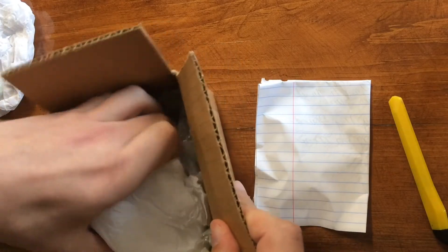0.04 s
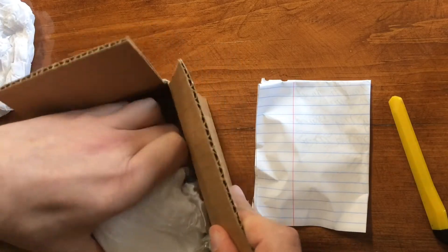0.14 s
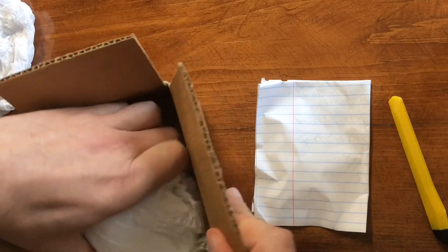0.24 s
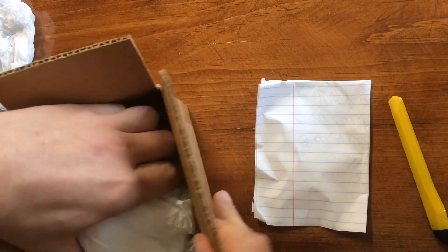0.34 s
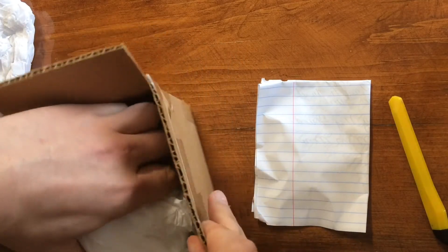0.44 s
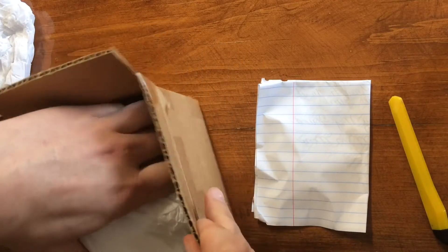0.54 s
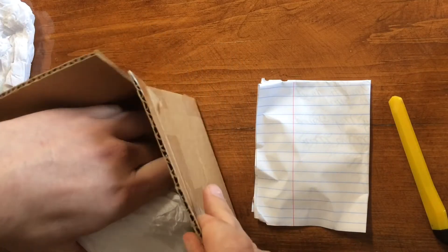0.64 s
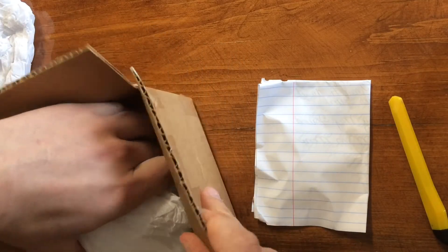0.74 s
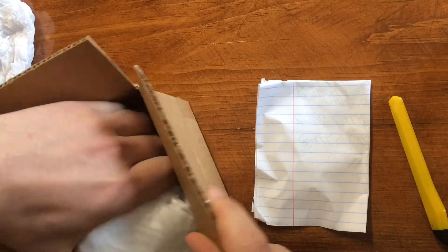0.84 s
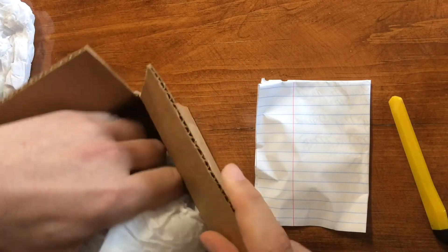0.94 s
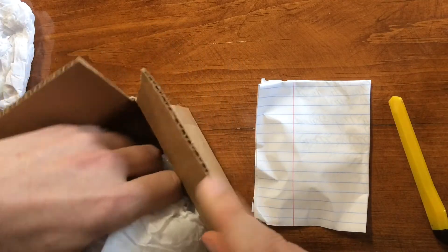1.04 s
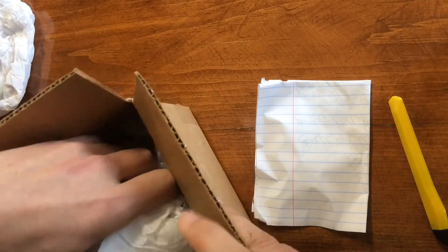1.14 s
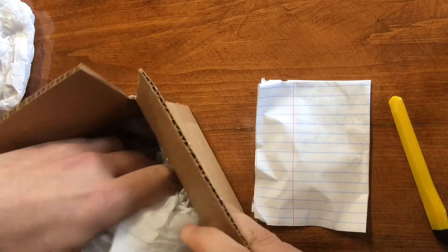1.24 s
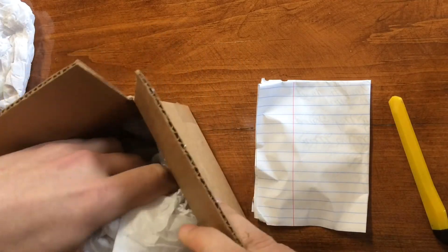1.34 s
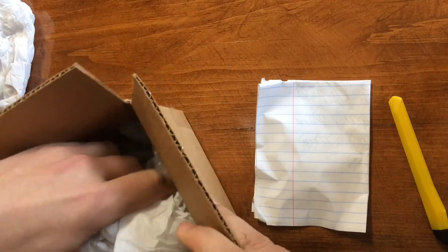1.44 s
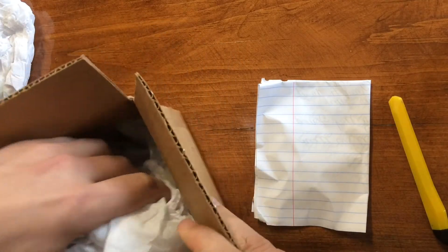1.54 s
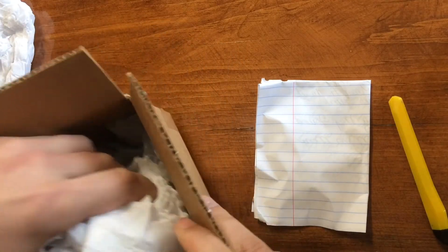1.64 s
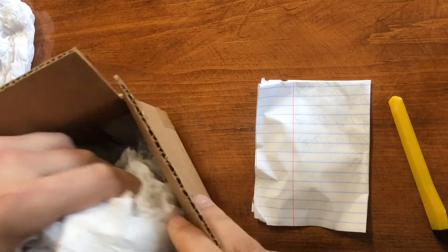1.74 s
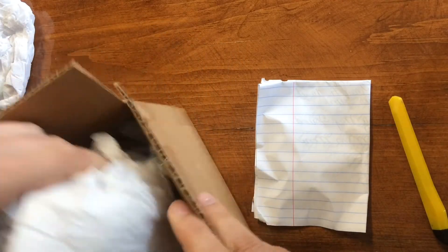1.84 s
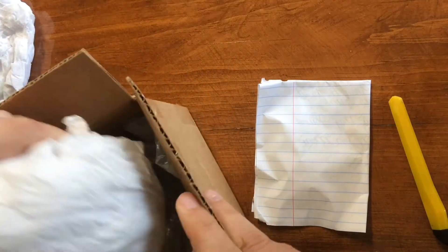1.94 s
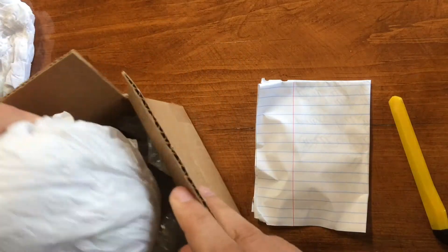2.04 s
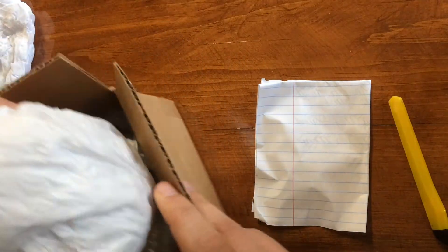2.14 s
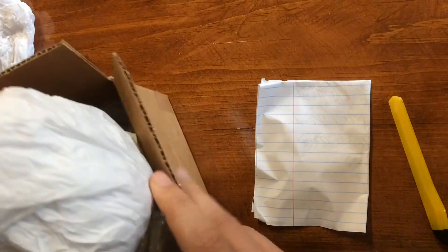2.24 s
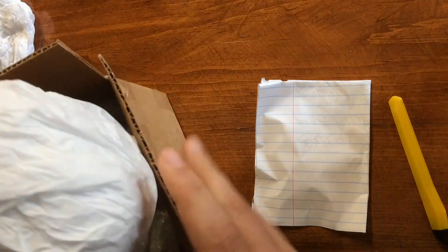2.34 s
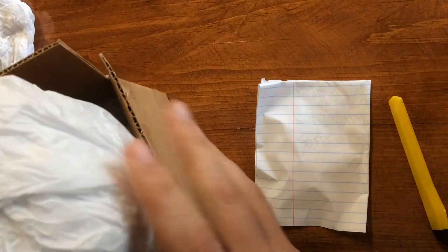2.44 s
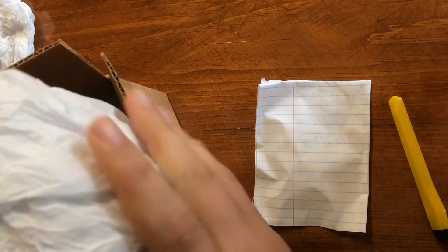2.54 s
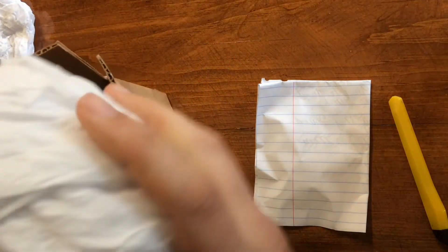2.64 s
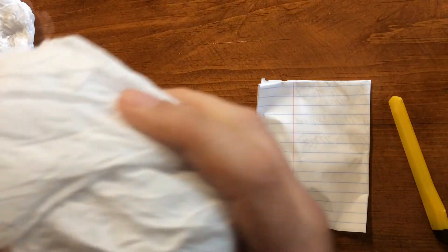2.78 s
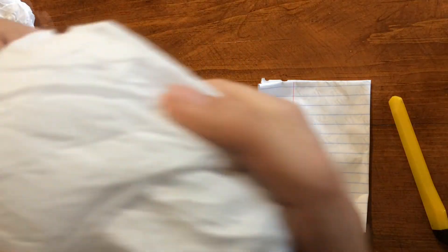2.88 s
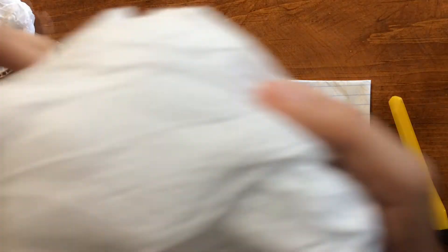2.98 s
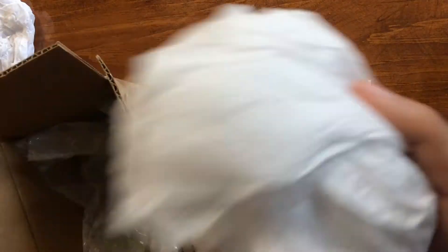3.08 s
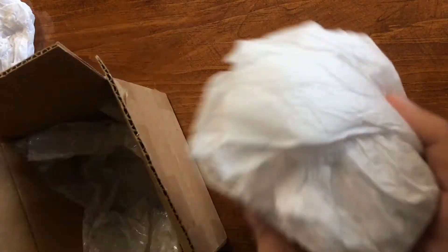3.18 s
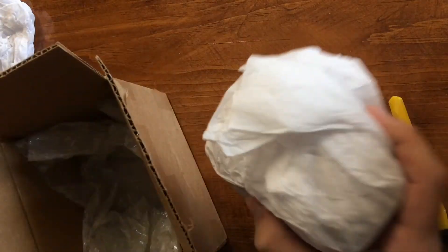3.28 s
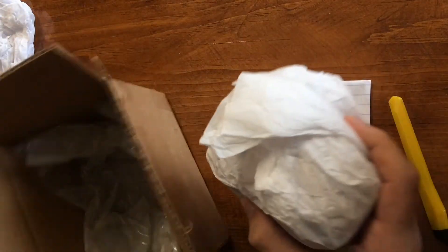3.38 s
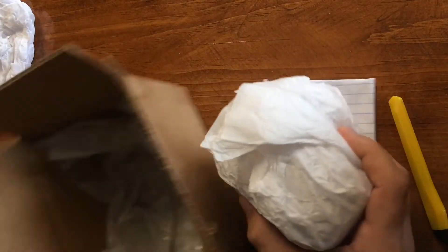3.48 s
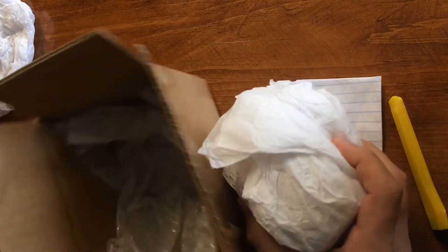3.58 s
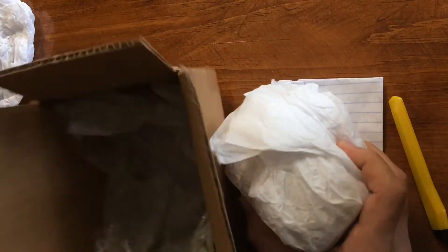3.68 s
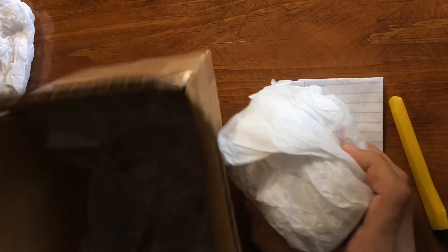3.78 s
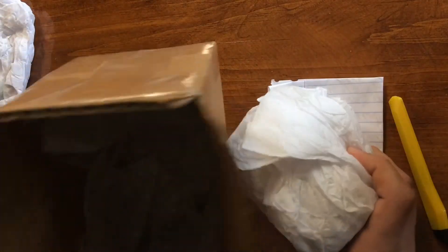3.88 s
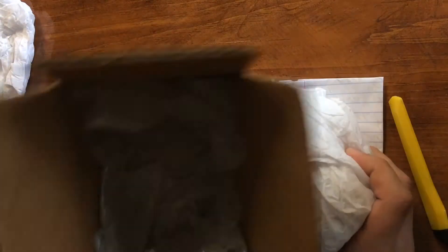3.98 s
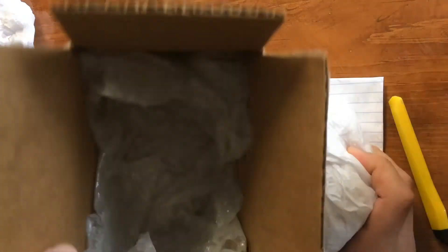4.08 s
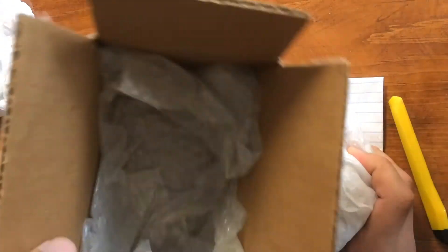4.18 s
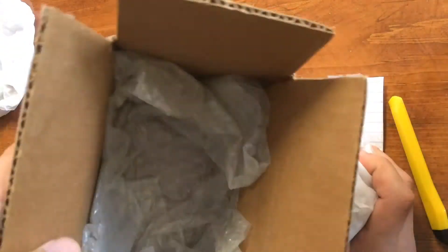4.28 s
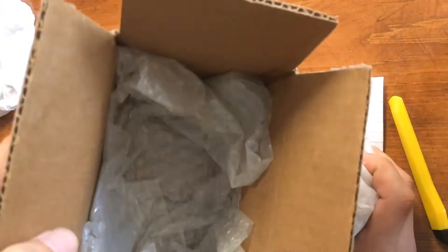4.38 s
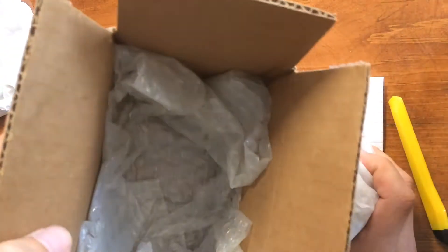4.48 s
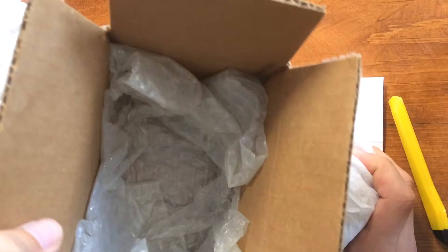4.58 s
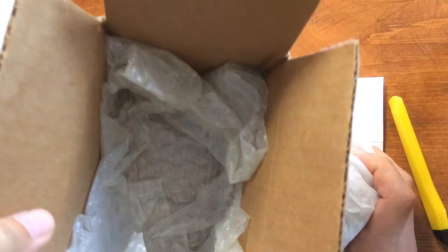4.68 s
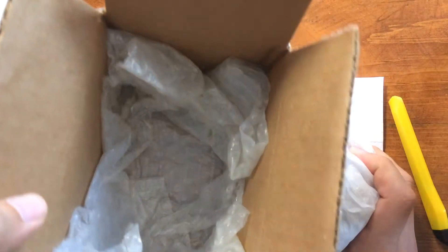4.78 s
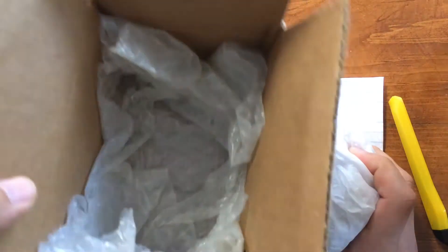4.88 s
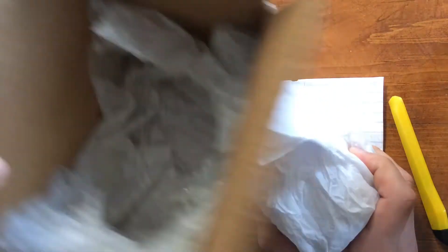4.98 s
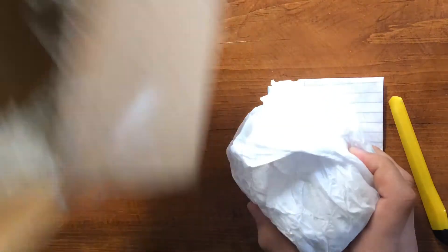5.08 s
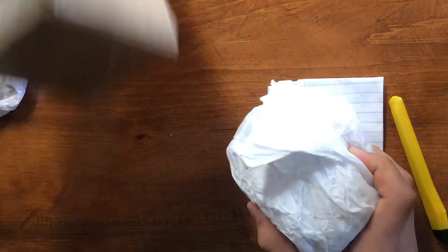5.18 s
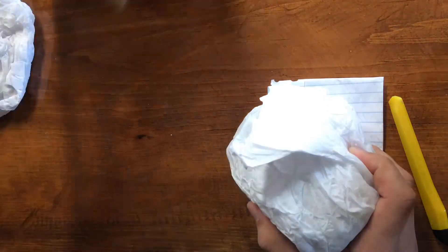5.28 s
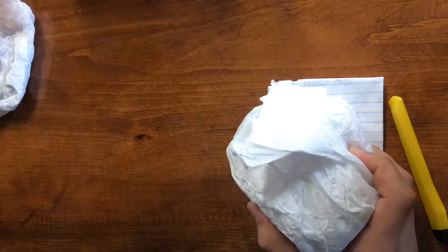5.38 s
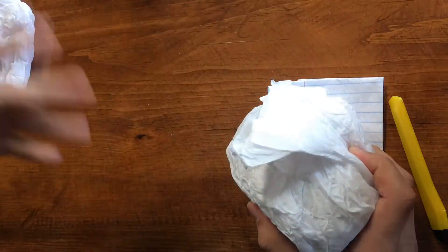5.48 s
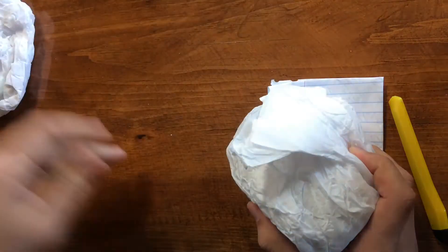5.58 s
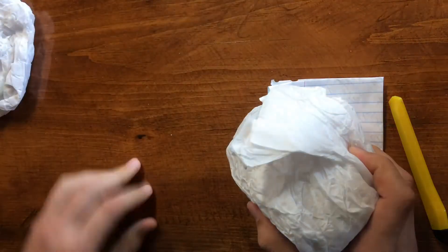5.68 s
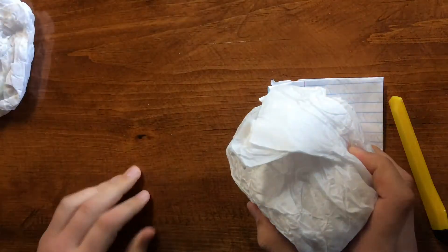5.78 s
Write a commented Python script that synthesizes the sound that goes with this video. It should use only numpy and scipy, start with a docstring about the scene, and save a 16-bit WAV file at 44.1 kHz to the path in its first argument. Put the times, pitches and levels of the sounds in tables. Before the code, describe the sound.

Close up in a small quiet room, hands rub wrapping paper against cardboard in quick uneven strokes with fine crinkles and ticks. A hollow box tap comes near two seconds, the bundle slides free, the box shifts softly, then it lands with a loud double knock and brief rattle.

```python
"""In a small room, close by, hands pull a paper-wrapped bundle out of a cardboard box on a wooden table.
Paper slides and crinkles (coloured random slips, resonant ticks); the box is tipped and its liner shifts.
The empty box is put down with a sharp double knock and a hand lands on the table (damped modes struck
by force pulses); the landed box judders and its flaps buzz. A wavering low sine hums in swells,
over sparse room reflections and a quiet tone of filtered noise."""
import sys
import numpy as np
from scipy import signal
from scipy.fft import rfft, irfft
from scipy.io import wavfile
from scipy.ndimage import map_coordinates

SR = 44100
rng = np.random.default_rng(int(sys.argv[2]) if len(sys.argv) > 2 else 0)


def pcm_store(signal):
    """Save signal as 16-bit PCM."""
    levels = np.round(np.clip(np.atleast_2d(signal), -1, 1) * 32767)
    wavfile.write(sys.argv[1], SR, levels.astype(np.int16).T)


N = 256826
TIME = np.arange(N) / SR  # s
FREQS = np.fft.rfftfreq(N, 1 / SR)  # Hz

# Strokes of the hands that slide paper over cardboard. Each row: start in seconds, length in seconds,
# relative level in dB, fizz of the fine fibres in dB, hollow tone of the walls in dB (both re the level).
STROKES = [(0.058, 0.23, -45.5, -3, -3.5), (0.293, 0.15, -41.5, -5, -5), (0.485, 0.2, -45.5, -6.5, -4.5),
           (0.65, 0.15, -48.5, -12, -2), (0.8, 0.24, -42.5, -6.5, -2.5), (1.08, 0.26, -47.5, -8, -2.5),
           (1.235, 0.13, -42, -6.5, -2.5), (1.364, 0.11, -44, -6, -5), (1.475, 0.11, -48, -4, -22),
           (1.586, 0.3, -45, -5.5, -8), (1.767, 0.19, -43.5, -3.5, -6), (1.942, 0.1, -54, -2, -24),
           (2.146, 0.042, -50, -2.5, -2.5), (2.229, 0.17, -57.5, -3, -4), (2.515, 0.17, -51, -5, -9),
           (2.634, 0.18, -42.5, -9.5, -10), (2.757, 0.28, -42, -13.5, -8.5), (2.868, 0.21, -44, -4.5, -3),
           (3.08, 0.23, -65, -8, -18), (3.418, 0.47, -48, -11.5, -2), (3.603, 0.38, -45.5, -1.4, -5),
           (3.974, 0.11, -45, -3, -13.5), (4.057, 0.105, -55, -2, -16), (4.167, 0.2, -51.5, -4.5, -11),
           (4.438, 0.067, -51.5, -5, -3.5), (4.622, 0.25, -54, -11, -8.5), (4.822, 0.28, -54.5, -3.5, -5.5),
           (5.248, 0.088, -49.5, -1.5, -5), (5.467, 0.035, -46, -10, -6), (5.49, 0.17, -66.5, 3.5, -16)]
STROKE_ARCH = 0.93  # power of the half sine that shapes the speed of a stroke
# Light rubbing between strokes while the hands keep hold. Each row: time in seconds, relative level in dB.
CONTACT = [(0, -50), (0.3, -50), (1.9, -50), (2.08, -66.5), (2.5, -61), (3.35, -63), (4.42, -60),
           (4.53, -70.5), (5.09, -56), (5.15, -81), (5.24, -62.5), (5.82, -71)]
CONTACT_FIZZ_DB, CONTACT_HOLLOW_DB = -6, -4  # re the contact level
# Colours of the rubbing: deep in the box, as the bundle comes free, as the box is dragged, and held tipped.
# Each row: frequency in Hz, relative density in dB per Hz.
INSIDE_COLOUR = [(150, -16), (250, -12), (392, -4.5), (443, -8.5), (708, -10), (967, -2), (1130, -5),
                 (1600, -7.5), (2150, -6), (2840, -9), (4610, -9.5), (5030, -9.5), (13100, -13),
                 (14700, -14), (15800, -20)]
BUNDLE_COLOUR = [(150, -49), (250, -29), (292, -9), (492, -6), (918, -11), (1040, -8), (1440, 0),
                 (2150, -7.5), (2840, -9), (3620, -7.5), (14500, -10), (15800, -22)]
DRAGGED_COLOUR = [(150, -38), (250, -8.5), (443, -9.5), (518, -9.5), (984, -1.5), (1690, -5), (3320, -2.5),
                  (4770, -6), (7240, -5.5), (14700, -8.5), (15800, -13)]
TIPPED_COLOUR = [(150, -14), (250, -6), (366, -2.5), (451, 5.5), (585, 1), (660, 7), (842, -3.5),
                 (1300, 4.5), (2890, -10.5), (3740, -3.5), (6090, -7), (7240, -4.5), (9230, -9),
                 (14500, -9.5), (15800, -16)]

# Crinkle level in dB at the ordinary rubbing level in dB, and its growth in dB per dB of rubbing.
CRINKLE_DB, ORDINARY_DB, CRINKLE_GROWTH = -52.5, -45, 0.78
# The loudest creases snapping over. Each row: time in seconds, relative level in dB, centre in Hz.
SNAPS = [(0.151, -14, 10700), (0.1684, -22, 4000), (0.2068, -12.5, 7000), (0.4304, -26, 4430),
         (0.4578, -19, 9000), (0.616, -19, 4740), (0.7, -20, 7000), (1.065, -18, 3640), (2.0084, -31, 3620),
         (2.183, -30, 1980), (2.2075, -35, 3000), (2.2358, -32, 7260), (2.345, -28, 2000),
         (2.6157, -20, 3200), (2.942, -16, 2167), (3.1058, -32, 2366), (3.1304, -28.5, 2870),
         (3.157, -32, 3190), (3.191, -30.5, 2940), (3.2577, -20.5, 4330), (3.5655, -30, 1900),
         (3.58, -20, 1790), (4.22, -24, 2200), (4.457, -32, 3920), (5.024, -21, 3500), (5.119, -32.5, 3500),
         (5.226, -33.5, 2060), (5.421, -25, 6000), (5.465, -39, 3000), (5.5652, -39, 2500),
         (5.797, -35, 5000)]
# Short skids of a cardboard or paper edge.
# Each row: start in seconds, length in seconds, level in dB, centre in Hz, sharpness as Q.
SKIDS = [(0.4316, 0.0025, -31.5, 4630, 8.2), (0.466, 0.0059, -42, 1150, 1.3),
         (0.528, 0.013, -46, 1000, 2.5), (0.589, 0.017, -46.5, 434, 2.7), (0.7016, 0.003, -42.5, 6500, 0.6),
         (0.872, 0.028, -43, 960, 12), (2.143, 0.008, -54.5, 1200, 0.5), (2.317, 0.022, -46.5, 425, 12),
         (2.94, 0.007, -37.5, 2200, 2.6), (3.426, 0.027, -52, 690, 0.62), (3.551, 0.024, -50.5, 380, 4.1),
         (3.558, 0.011, -44.5, 1040, 3.2), (4.217, 0.0089, -51.5, 2500, 0.43),
         (4.456, 0.0042, -51.5, 4500, 0.5), (4.923, 0.008, -48, 3500, 0.4),
         (5.264, 0.0093, -45, 2500, 0.66), (5.272, 0.0087, -40.5, 675, 1),
         (5.296, 0.013, -37.5, 3800, 0.89), (5.398, 0.0059, -32, 6500, 2.9),
         (5.481, 0.015, -41.5, 905, 1.6), (5.484, 0.042, -51.5, 1910, 27), (5.516, 0.028, -48, 690, 10),
         (5.702, 0.011, -44.5, 920, 2.9)]

# Blows on box and table. Each row: start in seconds, relative thump level in dB, thump pitch in Hz,
# thump t60 in seconds, relative clack level of the panels in dB, contact time in ms.
KNOCKS = [(0.614, -27, 211, 0.033, -58, 0.4), (1.081, -37, 146, 0.037, -35, 0.57),
          (1.287, -26, 260, 0.024, -40.5, 1.1), (1.9197, -17, 357, 0.058, -14, 0.26),
          (1.921, -11.5, 220, 0.017, -21.5, 0.082), (2.317, -35, 194, 0.14, -33, 0.27),
          (3.433, -46, 302, .04, -41, 0.32), (3.443, -33, 107, 0.046, -39.5, 0.93),
          (3.474, -34, 183, 0.04, -42.5, 0.49), (3.566, -40, 350, 0.025, -31, 0.1),
          (3.644, -32, 169.3, 0.18, -37.5, 0.55), (3.696, -36, 120, 0.033, -37, 0.81),
          (4.22, -44, 200, 0.058, -42, 0.13), (5.031, -41, 240, 0.037, -32, 1.2),
          (5.0485, -17, 164, 0.023, -27.5, 1.4), (5.3664, -16.5, 139, 0.036, -60, 3.4),
          (5.3734, 5.5, 243, 0.016, -16, 0.94), (5.377, -14, 703, 0.028, -21, 0.23),
          (5.4006, 1.5, 199.6, 0.061, -11.5, 1.02), (5.446, -27, 297, 0.037, -29, 2.2),
          (5.7006, -27.5, 193, 0.13, -28.5, 0.74), (5.707, -31.5, 80, 0.11, -39.5, 0.67)]
TICK_DB = -18.5  # surface tick, re the clack column
# Modes of the cardboard panels. Each row: frequency in Hz, relative strength in dB, t60 in seconds.
PANEL_MODES = [(175, 7.5, 0.028), (286, -9.5, 0.035), (344, -18, 0.033), (392, -1.5, 0.053),
               (572, -9.5, 0.054), (700, -2.5, 0.015), (949, 3.5, 0.015), (1360, 2, 0.0065),
               (1810, 3.5, 0.012), (2250, -20, 0.016), (2820, -18, 0.017)]
# The hard corner of the box striking the table.
# One row: start in seconds, relative level in dB, frequency in Hz, t60 in seconds.
CORNER = (5.3993, -5.5, 1910, .012)

# Judders of the landed box as it rocks. Each row: start in seconds, length in seconds, level in dB.
JUDDERS = [(5.415, 0.05, -31), (5.451, 0.04, -24), (5.522, 0.035, -37.5), (5.559, 0.02, -38.5)]
JUDDER_HZ, JUDDER_WAVER = 204, .054  # mean pitch, rms waver as a fraction
# Buzz of the flaps, a hard part and a loose part. Each row: relative starting level in dB, t60 in seconds.
FLAPS = [(-19, 0.075), (-38, 0.52)]
LANDED_S = 5.408  # the buzz starts here
# Colour of the buzz. Each row: frequency in Hz, relative density in dB per Hz.
BUZZ_COLOUR = [(100, -38), (330, 11.5), (520, 2), (700, -1), (850, -9), (1050, -13), (1500, -29),
               (1900, -5), (2200, -16), (2500, -20), (15000, -47)]

# Swells of the low hum. Each row: start in seconds, length in seconds, level in dB before the mix.
HUM_SWELLS = [(1.33, 0.26, -48.5), (1.63, 0.28, -50), (1.95, 0.24, -51), (2.356, 0.14, -52),
              (2.52, 0.15, -55), (2.872, 0.19, -49), (3.105, 0.09, -55), (3.31, 0.14, -56),
              (4.29, 0.18, -55.5), (4.494, 0.19, -57)]
HUM_STEADY_DB = -65  # constant part under the swells, before the mix
HUM_HIGH_HZ, HUM_LOW_HZ, HUM_SAG_S, HUM_SAG_LENGTH_S = 180, 165, 2.1, .15

# Decay of the room. Each row: frequency in Hz, t60 in seconds.
ROOM_DECAY = [(80, 1), (200, 0.39), (600, 0.41), (2000, 0.27), (6000, 0.08), (15000, 0.23)]
# Colour of the room tone. Each row: frequency in Hz, relative density in dB per Hz.
FLOOR_COLOUR = [(25, -34), (45, -1.5), (75, 1), (120, 7.5), (200, 0), (400, -16.5), (1000, -23),
                (3000, -26.5), (8000, -40), (16000, -23)]
FLOOR_DB = -59  # rms of the room tone
EDGE_HZ = 15750  # upper band limit


def amp(db):
    """Definition of the decibel: 20 dB is a factor of ten in amplitude."""
    return 10 ** (np.asarray(db) / 20)


def unit(x):
    """Normalisation: scales a signal to rms 1."""
    return x / np.sqrt(np.mean(x ** 2) + 1e-20)


def read(points, hz):
    """Interpolation of a spectrum table on a logarithmic frequency axis."""
    f, value = np.transpose(points)
    return np.interp(np.log(hz + 1), np.log(f + 1), value)


def follow(rows):
    """Linear interpolation of the columns of a curve table at every sample."""
    s, *columns = np.transpose(rows)
    return [np.interp(TIME, s, c) for c in columns]


def add(mix, s, sound):
    """Superposition: mixes a sound in, in place, from time s."""
    part = mix[max(round(s * SR), 0):][:len(sound)]
    part += sound[:len(part)]


def arch(t, start, length):
    """Half-sine pulse: rises and falls over length, silent outside."""
    return np.sin(np.pi * np.clip((t - start) / length, 0, 1)).clip(0)


def tint(x, spectrum):
    """Linear filtering: weights the spectrum of x by a table, at rms 1."""
    return unit(irfft(rfft(x) * amp(read(spectrum, FREQS)), N))


def resonate(x, hz, q):
    """Damped resonance: passes a band around hz, no broader than a floor on Q allows."""
    hz = min(hz, .4 * SR)
    b, a = signal.iirpeak(hz, max(q, 3 * hz / SR), fs=SR)
    return signal.lfilter(b, a, x)


def ring(t, hz, t60):
    """Free vibration: a struck mode falls by 60 dB in t60."""
    return np.sin(2 * np.pi * hz * t) * 1000 ** (-t / t60)


def wander(rate_hz):
    """Slow random fluctuation: low-passed noise at rms 1."""
    return unit(irfft(rfft(rng.standard_normal(N)) / (1 + (FREQS / rate_hz) ** 2), N))


def slips(per_s, spread_db):
    """Stick-slip as a random pulse train: most slips small, a few large."""
    size = amp(spread_db * np.minimum(rng.exponential(1, N), 5))
    happens = rng.random(N) < per_s / SR
    return size * rng.choice([-1., 1.], N) * happens


def sliding():
    """Friction follows speed: powers of strokes and light contact add, for walls, sheet and fibres."""
    offsets_db = np.array([[CONTACT_HOLLOW_DB], [0], [CONTACT_FIZZ_DB]])
    power = amp(follow(CONTACT)[0] + offsets_db) ** 2
    for s, length, db, fizz_db, hollow_db in STROKES:
        speed = arch(np.arange(0, length, 1 / SR), 0, length) ** STROKE_ARCH
        for band, colour_db in zip(power, (hollow_db, 0, fizz_db)):
            add(band, s, (amp(db + colour_db) * speed) ** 2)
    return np.sqrt(power)


def rubbing(hollow, level, fizz):
    """Dry friction: countless fibre slips, coloured by what slides on what, in three bands."""
    drive = slips(per_s=14000, spread_db=3.0) * amp(1.3 * wander(rate_hz=53))
    colours = [INSIDE_COLOUR, BUNDLE_COLOUR, DRAGGED_COLOUR, TIPPED_COLOUR]
    stage = np.interp(TIME, [1.8, 2.5, 3.2, 3.5, 3.9, 4.0], [0, 1, 1, 2, 2, 3])
    blend = np.zeros(N)
    for k, colour in enumerate(colours):
        share = np.sqrt(np.clip(1 - abs(stage - k), 0, 1))  # equal-power crossfade
        blend += share * tint(np.roll(drive, 999 * k), colour)  # shifted, so that the colours are unrelated
    spectrum = rfft(blend)
    low = 1 / (1 + (FREQS / 1400) ** 6)
    high = 1 - 1 / (1 + (FREQS / 7000) ** 6)
    walls = unit(irfft(spectrum * low, N))
    sheet = unit(irfft(spectrum * (1 - low - high), N))
    fibres = unit(irfft(spectrum * high, N))
    return amp(-0.54) * hollow * walls + amp(-2.01) * level * sheet + fizz * fibres


def reflect(x, gain, delay_ms, sway):
    """Comb interference: adds the reflection off a nearby flap whose distance sways."""
    delay = delay_ms * SR / 1000 * np.exp(sway * wander(rate_hz=1.2))  # samples
    echo = map_coordinates(x, [np.arange(N) - delay], order=3)
    return (x + gain * echo) / np.hypot(1, gain)


def crinkling(level):
    """Buckling: small wrinkles pop in clumps; each patch of sheet has its own pitch and busy moments."""
    clumps = amp(2.6 * wander(rate_hz=18))
    patches = np.zeros(N)
    for hz in np.geomspace(900, 12000, num=12):
        rate = 28 * clumps * amp(5 * wander(rate_hz=9))
        patches += unit(resonate(slips(per_s=rate, spread_db=3), hz, q=4))
    growth = (level / amp(ORDINARY_DB)) ** CRINKLE_GROWTH
    return amp(CRINKLE_DB) * growth * unit(patches)


def snaps():
    """Snap-through: a crease flips with one sharp tick, and the sheet shivers for a few milliseconds."""
    out, t = np.zeros(N), np.arange(1024) / SR
    for s, db, hz in SNAPS:
        tick = resonate(signal.unit_impulse(len(t)), hz, q=1.0)
        shiver = resonate(rng.standard_normal(len(t)), hz, q=0.21)
        add(out, s + .001, amp(db - 3.5) * tick / abs(tick).max())
        add(out, s + 0.0003, amp(db - 21.5) * unit(shiver) * np.exp(-t / 0.0026))
    return out


def skids():
    """Friction drives a resonance: an edge scrapes with a gritty rasp, sometimes close to a squeak."""
    out, grit = np.zeros(N), unit(slips(per_s=11000, spread_db=1.0))
    for s, length, db, hz, q in SKIDS:
        stroke = resonate(grit[round(s * SR):][:round(length * SR)], hz, q)
        add(out, s, amp(db) * unit(stroke * signal.windows.tukey(len(stroke), .5)))
    return out


def knocks():
    """Impact: a blow thumps, ticks at the surface and rings the panels as far as its contact time allows."""
    out, t = np.zeros(N), np.arange(SR // 3) / SR
    displacement = sum(amp(db) * ring(t, hz, t60) / hz for hz, db, t60 in PANEL_MODES)
    panels = np.gradient(displacement)  # the walls radiate by their speed
    for s, thump_db, hz, t60, clack_db, contact_ms in KNOCKS:
        u = 4000 * t / contact_ms  # the force peaks at a quarter of the contact time
        chatter = amp(-24) * rng.standard_normal(len(t)) * np.exp(-t / 0.0072)  # loose flaps touch again and again
        touches = signal.unit_impulse(len(t)) + chatter
        force = signal.fftconvolve(touches, u * np.exp(-u))[:len(t)]
        clack = signal.fftconvolve(panels, force)[:len(t)]
        thump = -ring(t, hz, t60) * (1 - np.exp(-t / 0.0015))
        tick = resonate(rng.standard_normal(len(t)), 4500, q=.7) * np.exp(-t / .0035)
        add(out, s, amp(thump_db) * thump)
        add(out, s, amp(clack_db + 2.0) * clack / abs(clack).max())
        add(out, s, amp(clack_db + TICK_DB) * tick)
    s, db, hz, t60 = CORNER
    add(out, s, amp(db) * ring(t, hz, t60) * (1 - np.exp(-t / .0009)))
    return signal.sosfilt(signal.butter(2, 65, "high", fs=SR, output="sos"), out)


def rocking():
    """Rocking and rattle: the landed box judders at a wavering low pitch while its flaps' buzz decays."""
    turns = np.cumsum(JUDDER_HZ * (1 + JUDDER_WAVER * wander(rate_hz=57))) / SR
    shudder = sum(amp(db) * arch(TIME, s, length) for s, length, db in JUDDERS)
    judder = shudder * np.sqrt(2) * np.sin(2 * np.pi * turns)
    since = np.maximum(TIME - LANDED_S, 0)
    decay = sum(amp(db) * 1000 ** (-since / t60) for db, t60 in FLAPS) * (since > 0)
    flicker = amp(2.8 * wander(rate_hz=130))
    return judder + decay * flicker * tint(rng.standard_normal(N), BUZZ_COLOUR)


def hum():
    """Frequency and amplitude modulation: a soft low sine swells, sags once in pitch and wavers."""
    sag = (1 - np.tanh((TIME - HUM_SAG_S) / HUM_SAG_LENGTH_S)) / 2
    hz = HUM_LOW_HZ + (HUM_HIGH_HZ - HUM_LOW_HZ) * sag
    turns = np.cumsum(hz * (1 + 0.0524 * wander(rate_hz=30.4))) / SR
    level = amp(HUM_STEADY_DB) + sum(amp(db) * arch(TIME, s, length) for s, length, db in HUM_SWELLS)
    flutter_db = 2.5 * wander(rate_hz=25)
    return level * amp(flutter_db) * np.sqrt(2) * np.sin(2 * np.pi * turns)


def room(x):
    """Reverberation: sparse reflections, each band dying at its own speed."""
    late = np.arange(SR) > .005 * SR  # nothing in the first 5 ms
    taps = rng.choice([-1., 1.], SR) * (rng.random(SR) < 3000 / SR) * late
    hz, t, bands = signal.stft(taps, SR, nperseg=256)
    decay = 1000 ** (-t / read(ROOM_DECAY, hz)[:, None])
    tail = signal.istft(bands * decay, SR, nperseg=256)[1]
    return signal.fftconvolve(x, tail / np.linalg.norm(tail))[:N]


def room_tone():
    """Stationary background: noise filtered to a mostly low colour."""
    return amp(FLOOR_DB) * tint(rng.standard_normal(N), FLOOR_COLOUR)


def scene():
    """Superposition of paper, box, hum, their room and its tone; the hum adds no reflections."""
    hollow, level, fizz = sliding()
    rustle = rubbing(hollow, level, fizz)
    rustle = reflect(rustle, gain=.24, delay_ms=.4, sway=.25)
    rustle = reflect(rustle, gain=.2, delay_ms=1.1, sway=.2)
    paper = rustle + crinkling(level) + snaps() + skids()
    box = knocks() + rocking()
    reflections = room(amp(-15.5) * paper + amp(-23.0) * box)
    return (paper + box + amp(-4.0) * hum() + reflections + room_tone())[None]


def record(dry):
    """Band limitation: a linear-phase low-pass removes what lies above the upper edge."""
    lowpass = signal.firwin(511, EDGE_HZ, window=("kaiser", 9), fs=SR)
    return signal.oaconvolve(dry, lowpass[None], "same")


dry = scene()
out = record(dry)
pcm_store(out)
```